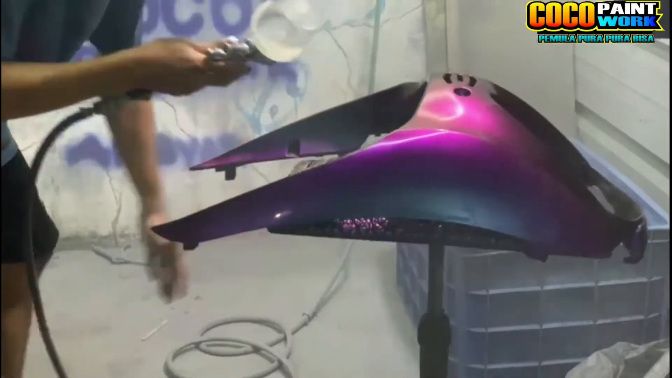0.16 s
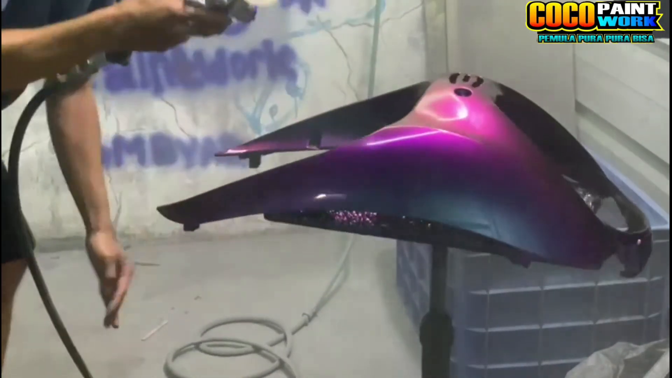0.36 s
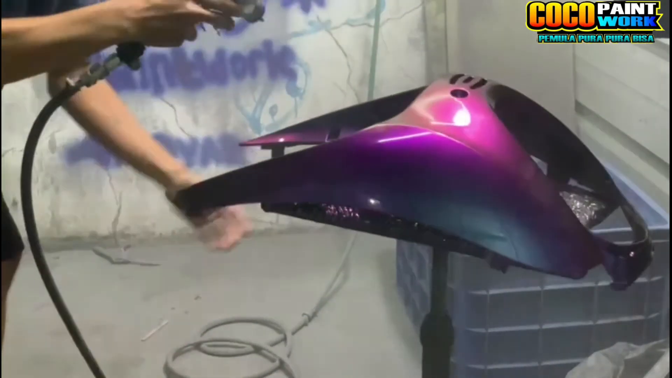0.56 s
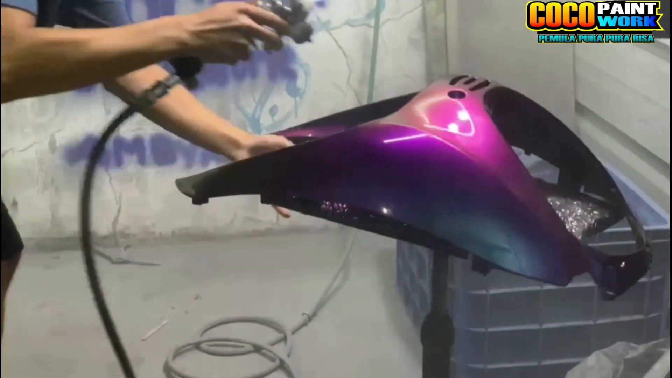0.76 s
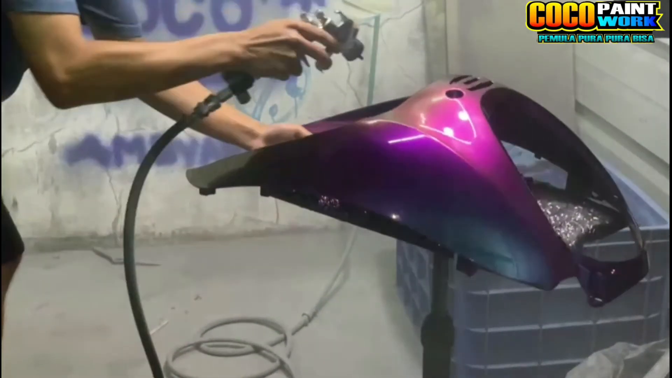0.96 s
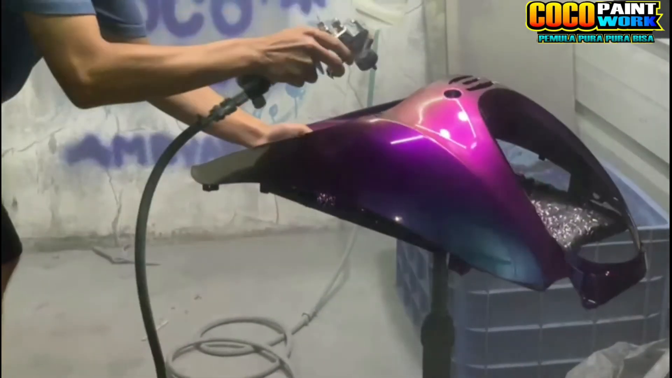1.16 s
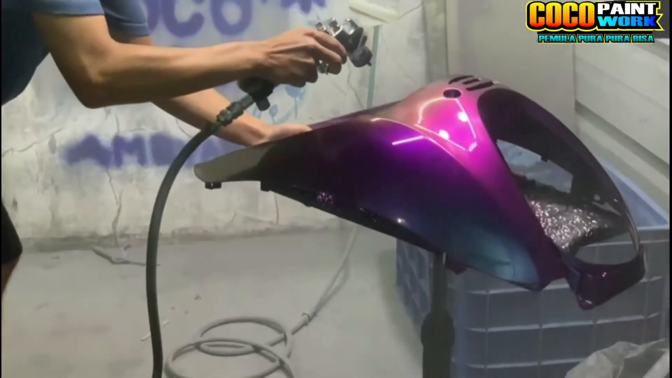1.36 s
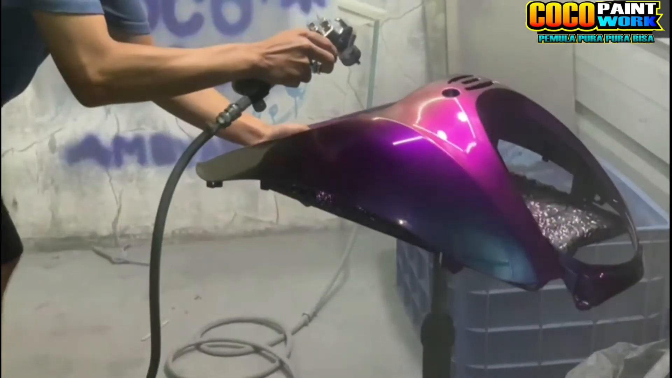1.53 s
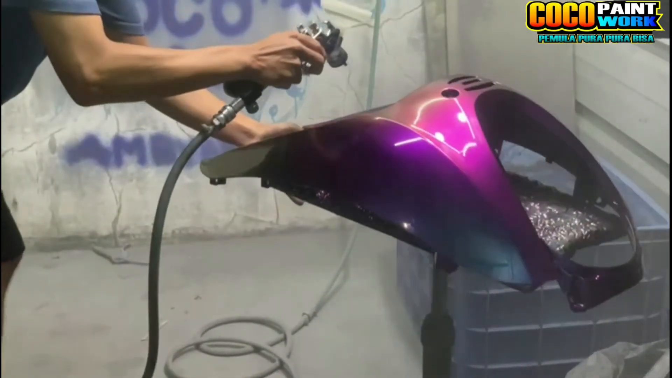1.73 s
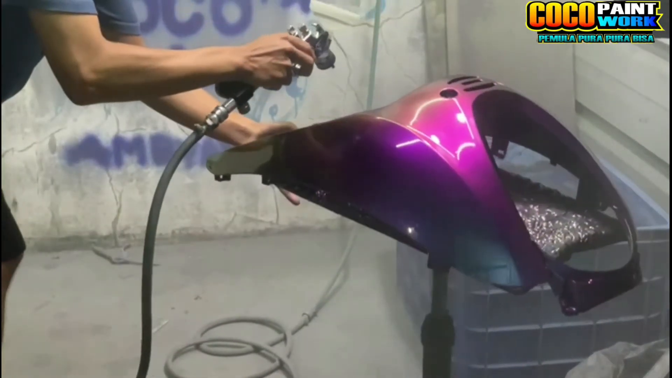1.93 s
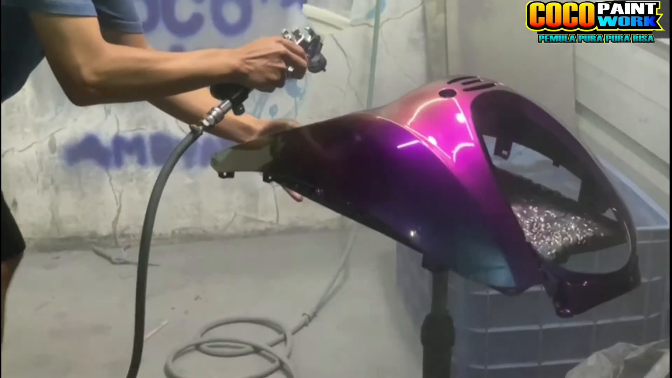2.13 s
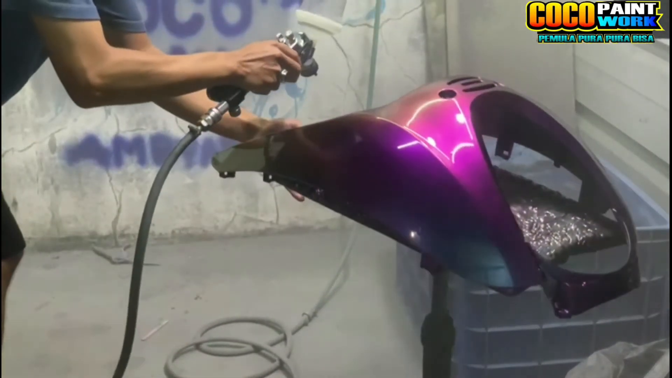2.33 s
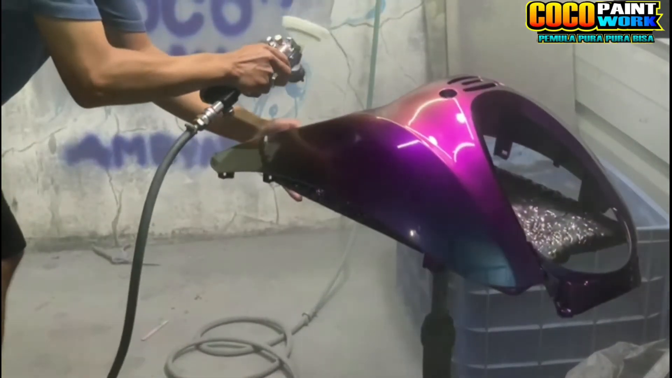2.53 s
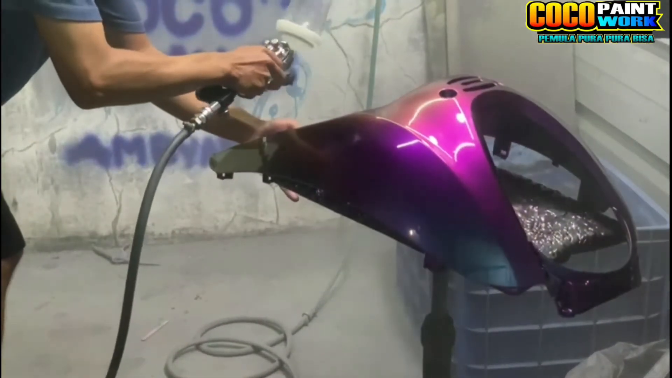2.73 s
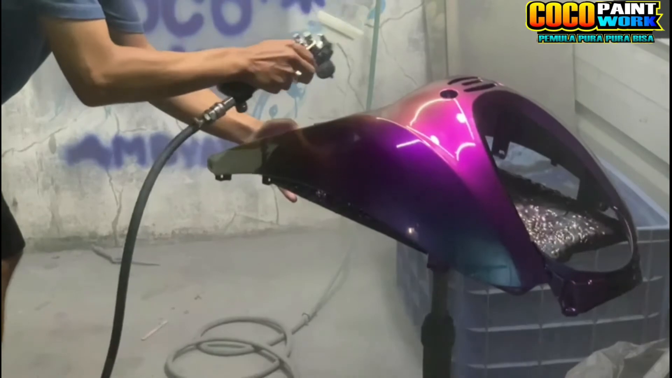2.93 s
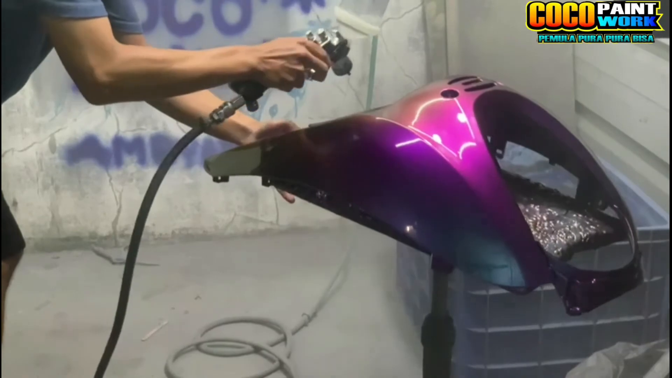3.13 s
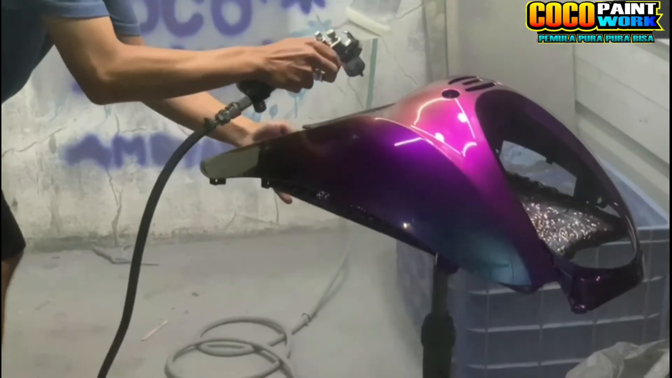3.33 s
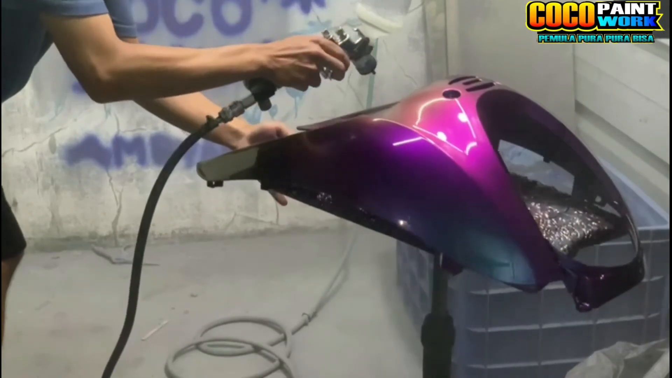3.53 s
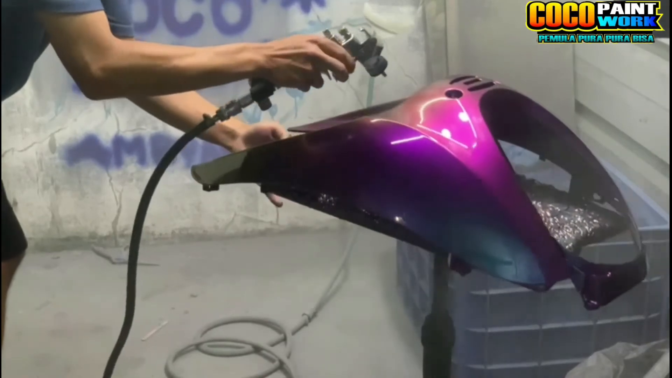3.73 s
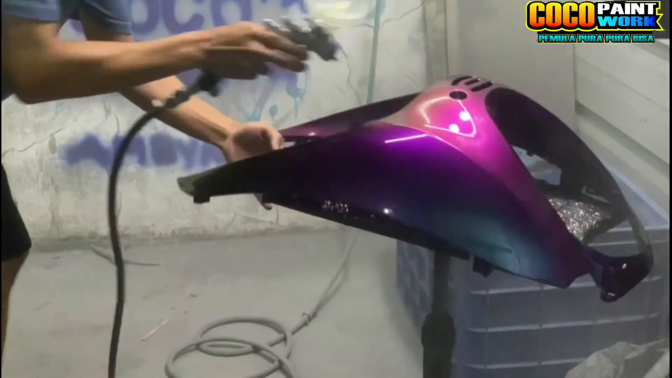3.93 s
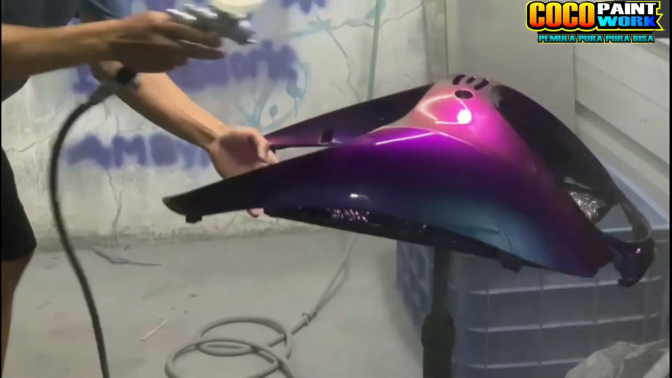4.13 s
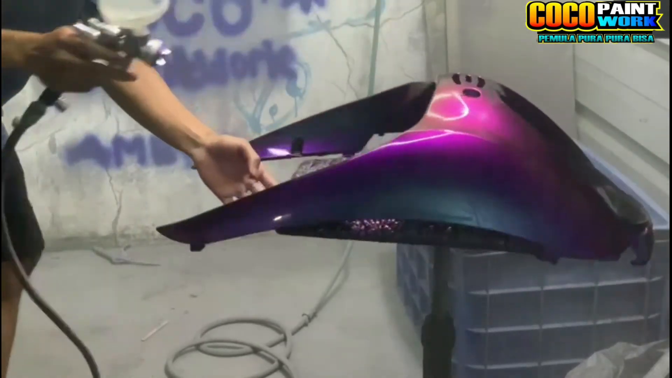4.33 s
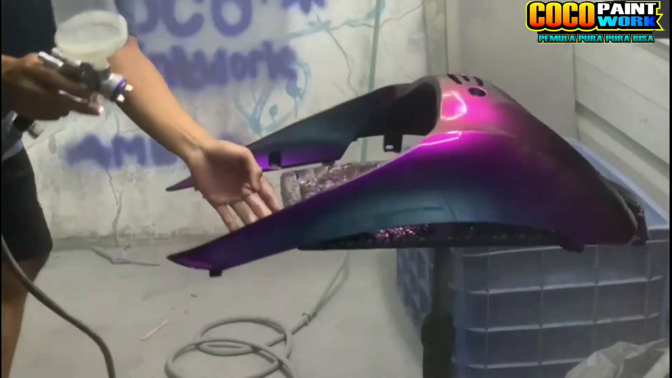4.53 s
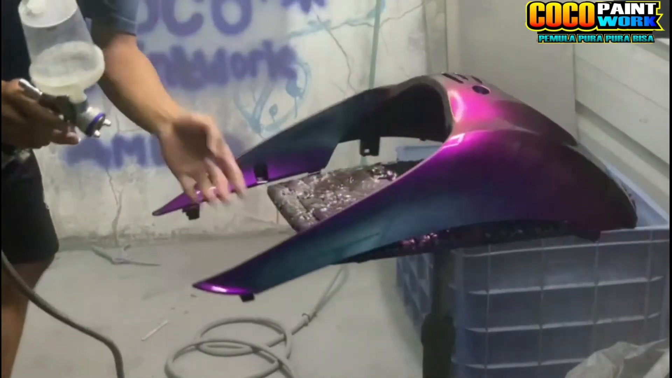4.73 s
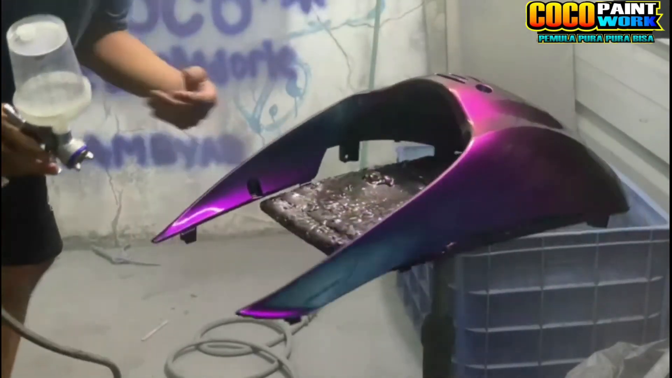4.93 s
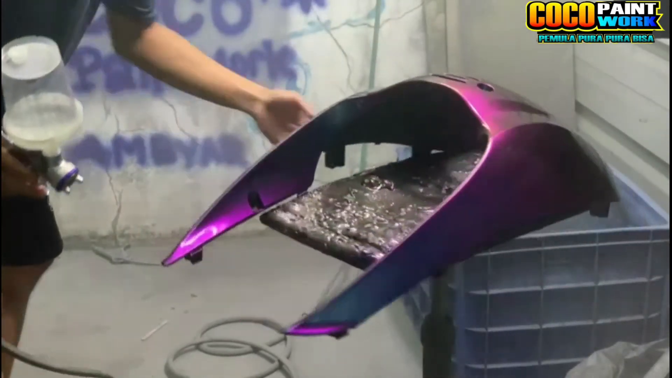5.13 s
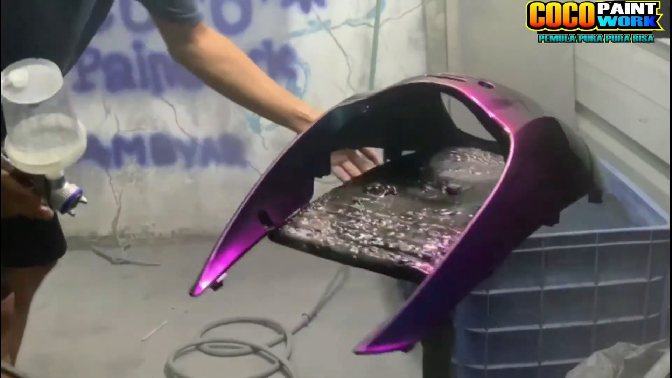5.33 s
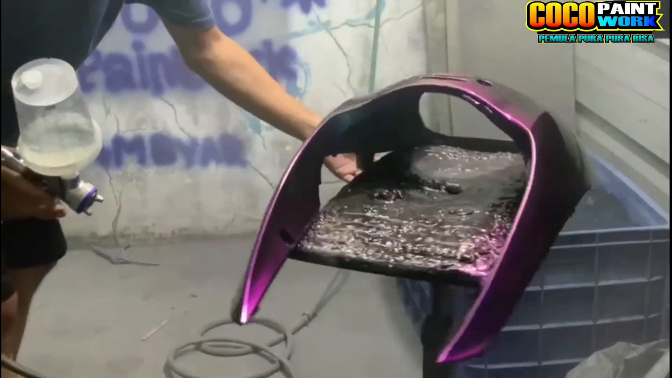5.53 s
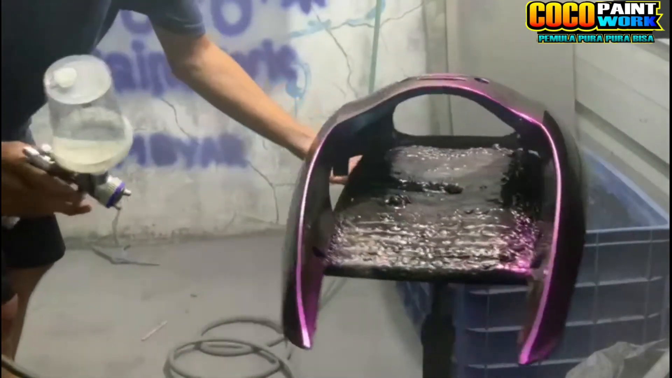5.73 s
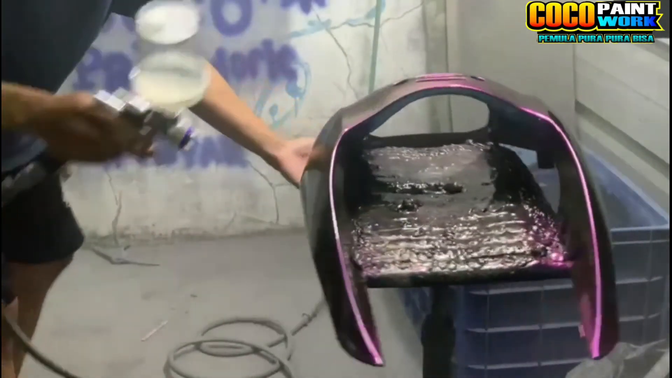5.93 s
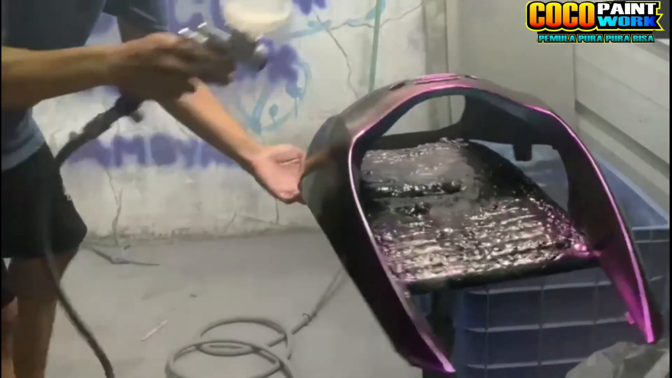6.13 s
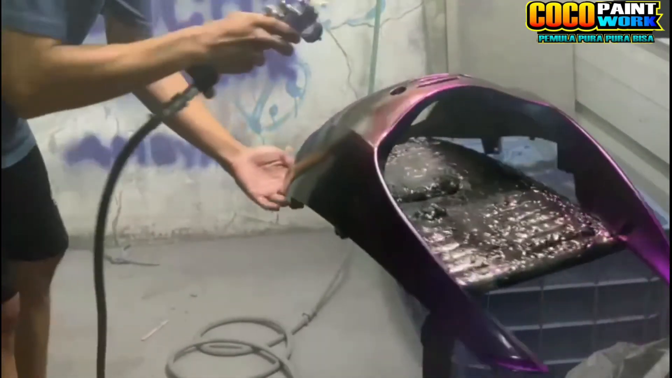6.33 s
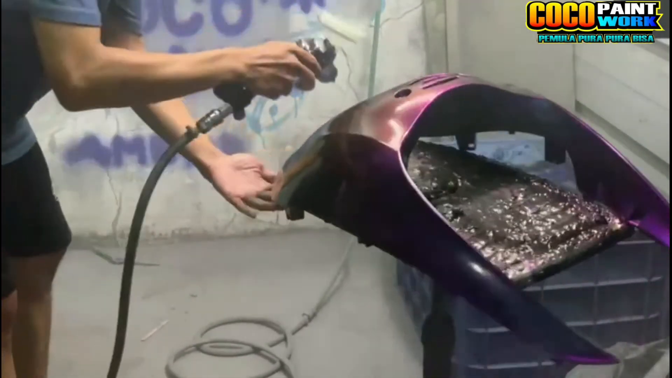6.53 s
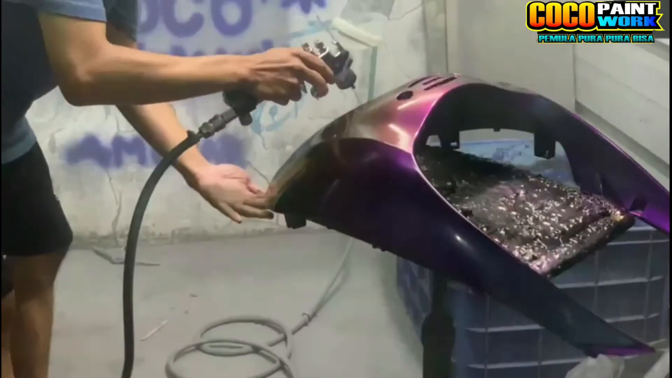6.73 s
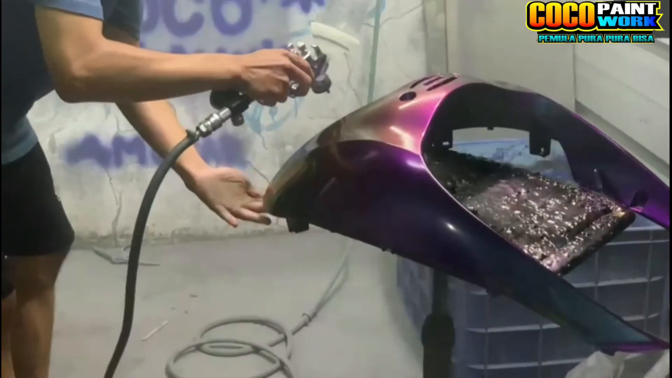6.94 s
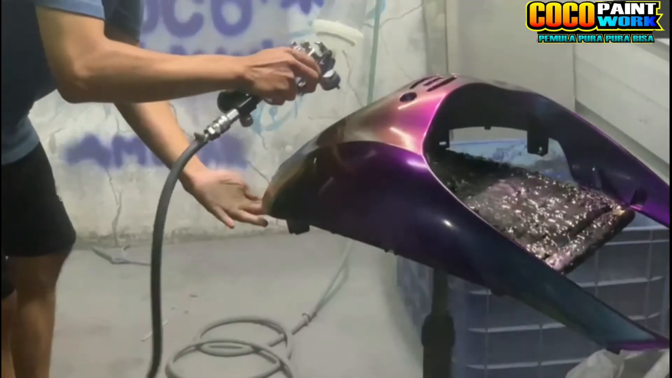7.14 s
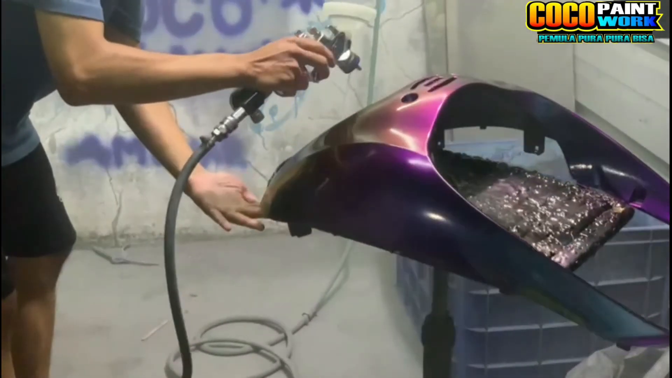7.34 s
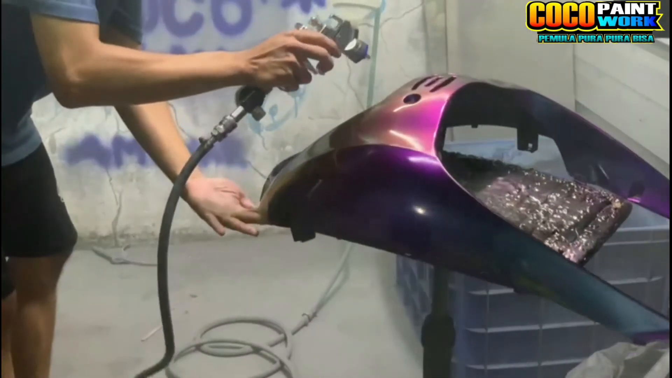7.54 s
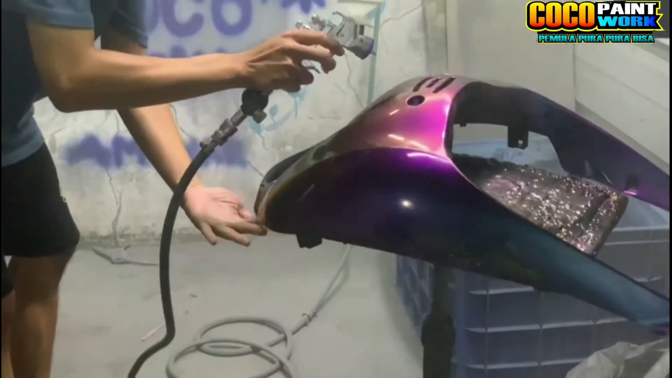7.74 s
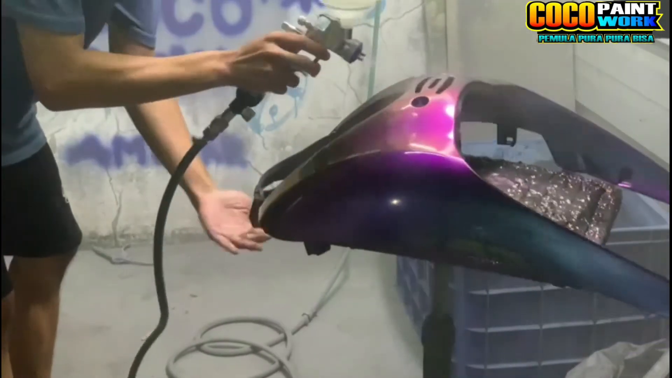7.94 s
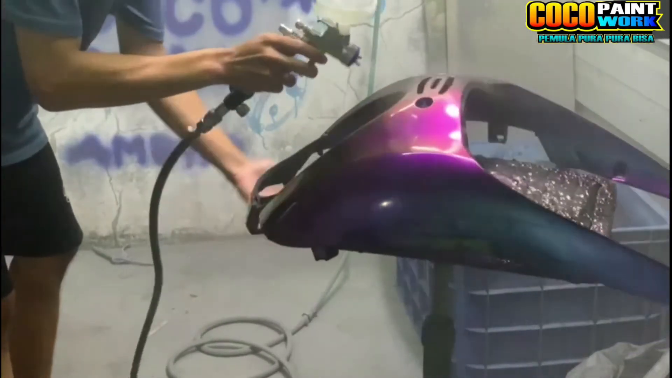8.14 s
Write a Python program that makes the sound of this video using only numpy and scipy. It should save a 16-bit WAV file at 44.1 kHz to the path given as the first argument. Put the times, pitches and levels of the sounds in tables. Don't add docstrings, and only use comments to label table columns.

```python
import sys
import numpy as np
from scipy import signal
from scipy.fft import rfft, irfft, next_fast_len
from scipy.io import wavfile
from scipy.ndimage import uniform_filter1d

SR = 44100
rng = np.random.default_rng(int(sys.argv[2]) if len(sys.argv) > 2 else 0)


def convert_level_to_amplitude(level_db):
    exponent = np.asarray(level_db, float) / 20
    return 10 ** exponent


def int16_out(signal):
    q = np.round(np.clip(np.atleast_2d(signal).T, -1, 1) * 32767)
    wavfile.write(sys.argv[1], SR, q.astype(np.int16))


N = 360738
LEAD = 30000
HZ = np.fft.rfftfreq(next_fast_len(N + LEAD), 1 / SR)
PORT_LAG_S = .000452


def unit(x):
    return x / np.sqrt(np.mean(x ** 2))


def over_hz(table):
    hz, value = np.transpose(table)
    return np.interp(np.log(HZ + 1), np.log(hz), value)


def shape(x, gain):
    size = 2 * len(HZ) - 2
    return irfft(rfft(x, size) * gain, size)[..., :x.shape[-1]]


def walk(rate_hz, count=N):
    hold = int(SR / rate_hz)
    levels = np.repeat(rng.standard_normal(count // 200 + 2), hold)[:count]
    return 1.34 * uniform_filter1d(uniform_filter1d(levels, hold), hold)


def smooth_noise(size, *passes):
    noise = rng.standard_normal(size)
    for width, axis in passes:
        noise = uniform_filter1d(noise, size=width, axis=axis)
    return noise


def eddies(shape_db, flicker_db, rate_hz, count=N):
    out = 0
    for octave in np.arange(4, 14, 1 / 3):
        band = np.clip(1 - abs(np.log2(HZ + 1) - octave) * 3, 0, 1) ** .5
        if np.max(shape_db[band > 0]) > np.max(shape_db) - 60:
            flicker = convert_level_to_amplitude(flicker_db * walk(rate_hz, count=count))
            out = out + flicker * shape(rng.standard_normal(count), band * convert_level_to_amplitude(shape_db))
    return out


def ducking():
    wait_s, duck_s, recover_s = 0.46, 0.071, 0.63
    t, down = np.arange(N) / SR, 0
    for pull_s, release_s, *_ in TRIGGER:
        fall = 1 - np.exp(-np.maximum(t - pull_s - wait_s, 0) / duck_s)
        down = np.maximum(down, fall * np.exp(-np.maximum(t - release_s, 0) / recover_s))
    return down


# shaft multiple, level/dB
SHAFT_TONES = [(1, -40), (2, -55), (3, -47), (4, -34), (5, -53.5), (6, -42.5), (8, -53), (10, -45),
               (13, -56), (15, -74), (33, -56), (48, -56), (92, -66), (96, -58)]
# blade-rate multiple, level/dB
BLADE_TONES = [(1, -36.5), (3, -51), (4, -52), (5, -54), (6, -57), (7, -59), (8, -57), (9, -55), (10, -58),
               (11, -58), (12, -55), (13, -63), (15, -68)]
# f/Hz, level/dB
MAINS_HUM = [(50, -41.5), (100, -55), (612, -48.5)]
# f/Hz, density/dB per Hz
RUSH = [(30, -84), (75, -83), (130, -54.5), (260, -57.5), (330, -60.5), (400, -69.5), (700, -68),
        (1200, -69.5), (2400, -74), (4000, -75.5), (6000, -78.5), (8000, -89), (9100, -100), (10300, -99.5),
        (11000, -99), (12000, -102)]
# f/Hz, width/Hz, density/dB per Hz
ROOM_MODES = [(74.4, 6.2, -57), (122, 20, -61), (158, 13.5, -50.5), (212, 18, -49.5), (238.5, 13, -52),
              (302, 24, -56), (370.7, 12, -59.5), (425.7, 23, -59), (497, 20, -57), (535.5, 18, -58.5),
              (667, 29, -64), (767.6, 47, -58.5), (803, 64, -60.5), (870, 20, -65.5)]
# f/Hz, likeness/0-1
FAN_ALIKE = [(45, .99), (100, .997), (160, .97), (380, .96), (550, .85), (800, .7), (1000, .2), (3000, .3),
             (5000, .45), (9000, .45)]


def fan():
    shaft_hz, blades, fan_db, duck_db = 46.155, 7, -33.5, -1.5
    turn = 2 * np.pi * np.cumsum(shaft_hz * (1 + .00012 * walk(1.5))) / SR
    booms = sum(convert_level_to_amplitude(db) ** 2 / (1 + (2 * (HZ - hz) / width) ** 2) ** 2 for hz, width, db in ROOM_MODES)
    air_db = 10 * np.log10((convert_level_to_amplitude(over_hz(RUSH)) ** 2 + booms) * SR / 2)
    uneven = []
    for k in range(16, 195):
        slope_db = -62.5 - .085 * k - .1 * max(k - 150, 0)
        bunch_db = 3.5 * np.cos(2 * np.pi * (k - 33.0) / 19.6)
        uneven.append((k, slope_db + bunch_db + 2.5 * rng.standard_normal()))
    tones = SHAFT_TONES + [(blades * k, db) for k, db in BLADE_TONES] + uneven
    tones = tones + [(hz / shaft_hz, db) for hz, db in MAINS_HUM]
    heard = []
    for _ in range(2):
        air = eddies(air_db, 0.99, 6)
        high = shape(air, HZ > 1500)
        start = rng.uniform(0, 2 * np.pi, len(tones))
        whine = 0
        for (k, db), phase in zip(tones, start):
            surge_db = 1.5 * walk(5.5) if k < 16 else 0
            whine = whine + convert_level_to_amplitude(db + 2.5 + surge_db) * np.sin(k * turn + phase)
        heard.append(air + .08 * np.cos(turn) * high + whine)
    alike = np.clip(over_hz(FAN_ALIKE), 0, .998)
    lag = np.exp(-2j * np.pi * HZ * (HZ > 1300) * PORT_LAG_S)
    right = shape(heard[0], alike * lag) + shape(heard[1], np.sqrt(1 - alike ** 2))
    return np.array([heard[0], right * convert_level_to_amplitude(0.9)]) * convert_level_to_amplitude(fan_db + 32.5 + duck_db * ducking())


def room(x):
    t60_s, treble_t60_s, build_s = 0.5, 0.33, 0.0031
    t, hop = np.arange(SR // 2) / SR, SR // 8
    out = np.zeros((2, len(x) + SR))
    fade = np.sin(np.pi * np.arange(2 * hop) / (2 * hop))
    lowpass = signal.butter(2, 3000, fs=SR, output="sos")
    for at in range(0, len(x) - hop, hop):
        noise = rng.standard_normal((2, len(t))) * (1 - np.exp(-t / build_s))
        dull = signal.sosfilt(lowpass, noise)
        tail = dull * convert_level_to_amplitude(-60 * t / t60_s) + (noise - dull) * convert_level_to_amplitude(-60 * t / treble_t60_s)
        tail = tail / np.sqrt(np.sum(tail ** 2, axis=1, keepdims=True))
        piece = x[at:at + 2 * hop]
        wet = signal.fftconvolve((piece * fade[:len(piece)])[None], tail)
        out[:, at:at + wet.shape[1]] += wet
    return out[:, :len(x)]


# open t/s, close t/s, nozzle hiss level/dB, panel wash level/dB, panel roar level/dB
TRIGGER = [
    (-.5, .03, -29, -45, -52.5),
    (1.05, 3.855, -24.5, -38, -44.5),
    (6.753, 9.0, -24, -37.5, -36.5),
]
# f/Hz, density/dB per Hz
NOZZLE = [(1500, -24), (3000, -11), (4300, -3), (5000, 0), (5600, 0), (6500, 1), (7300, -0.8), (8100, -5),
          (8700, -8.5), (9300, -8.5),
          (10200, -10), (10900, -9), (11500, -10), (11750, -15), (12400, -19)]
# f/Hz, density/dB per Hz
WASH = [(900, -23), (1300, 0), (1750, -3), (2300, -2), (3200, 3.5), (4500, 0.5), (7000, -56)]
# f/Hz, density/dB per Hz
ROAR = [(350, -8.5), (600, 1), (900, -1.5), (1300, -14.5), (2000, -14.5)]


def spray_gun():
    open_s, close_s, room_db = 0.0099, 0.019, 8
    build_db, build_s = -3, 0.27
    surplus_db, sag_s, roar_surplus_db = 3.5, 0.42, .5
    t = np.arange(-LEAD, N) / SR
    count = len(t)
    hiss = unit(eddies(over_hz(NOZZLE), 0.45, 14, count=count)) * convert_level_to_amplitude(0.24 * walk(4.6, count=count))
    wash = unit(eddies(over_hz(WASH), 0.7, 10, count=count)) * convert_level_to_amplitude(0.25 * walk(4.0, count=count))
    roar = unit(eddies(over_hz(ROAR), 1.9, 23, count=count)) * convert_level_to_amplitude(2.2 * walk(3.5, count=count))
    jet = 0
    for pull_s, release_s, hiss_db, wash_db, roar_db in TRIGGER:
        valve = np.clip((t - pull_s) / open_s, 0, 1) * np.clip((release_s - t) / close_s, 0, 1)
        since = np.maximum(t - pull_s, 0)
        surplus = np.exp(-since / sag_s)
        flow = valve * convert_level_to_amplitude(build_db * np.exp(-since / build_s) + surplus_db * surplus)
        panel = wash * convert_level_to_amplitude(wash_db + 3) + roar * convert_level_to_amplitude(roar_db + roar_surplus_db * surplus)
        jet = jet + flow * (hiss * convert_level_to_amplitude(hiss_db) + panel)
    direct = np.array([jet, shape(jet, np.exp(-2j * np.pi * HZ * PORT_LAG_S))])
    return ((direct + convert_level_to_amplitude(room_db) * room(jet)) * convert_level_to_amplitude(-7.5))[:, LEAD:]


def scene():
    return spray_gun() + fan()


# f/Hz, level/dB
RIGHT_PORT = [(3000, -.6), (5500, -.6), (6600, .8), (7500, 3.3), (8200, 6.5), (8800, 5.5), (10000, 0.1)]
# f/Hz, phase/rad
BASS_TURN = [(46, 3.52), (95, 3.17), (140, 3.05), (220, 1.7), (310, 0.0), (420, -.25), (460, -1.6),
             (560, -1.7), (650, -1.0), (900, -.8), (1400, 0.0)]
# f/Hz, density/dB per Hz
DRAUGHT = [(10, -64), (25, -90), (45, -59), (68, -67), (85, -74.5), (110, -100), (200, -150)]


def ports(dry):
    right = shape(dry[1], convert_level_to_amplitude(over_hz(RIGHT_PORT)) * np.exp(1j * over_hz(BASS_TURN)))
    gust = shape(rng.standard_normal((2, N)), convert_level_to_amplitude(over_hz(DRAUGHT)) * np.sqrt(SR / 2)) * convert_level_to_amplitude(2.5 * walk(6))
    return np.array([dry[0], right]) + gust


# f/Hz, level/dB
DIFFERENCE_LEAN = [(2000, 0), (3300, .8), (4400, 1.2), (4900, 1), (5500, 3.2), (6000, 2.4), (6300, 0),
                   (6700, -1.5), (7300, -.3), (8900, .3), (9200, -13), (10200, -13), (10330, 0), (10600, 6),
                   (10950, 11), (11200, 24)]
# f/Hz, depth/dB
FINENESS = [(86, 31), (260, 24), (700, 18), (1200, 12), (2600, 5.5), (5000, 7.5), (7500, 12.5), (9800, 0.5)]
STEP_BANDS = np.r_[0:40:4, 40:96:8, 96:144:12, 144, 160, 176, 196, 216, 240, 264, 292, 320:560:32]
# t/s, length/s, f/Hz, width/Hz
DROPOUTS = [(.07, .06, 3400, 350), (.165, .07, 5500, 500), (.21, .07, 2900, 300), (.24, .05, 3700, 300),
            (.3, .09, 2580, 250), (.345, .07, 3550, 400), (.4, .04, 5500, 600), (.54, .14, 5500, 300),
            (.55, .05, 3350, 350), (.63, .07, 5750, 300), (.68, .12, 2720, 150), (1.25, .06, 5500, 200),
            (1.345, .04, 5450, 350), (1.36, .03, 3200, 150), (1.66, .02, 5450, 450), (2.03, .03, 5100, 350),
            (2.49, .03, 3600, 250), (2.87, .07, 5300, 150), (2.95, .08, 5850, 150), (3.1, .1, 5950, 150),
            (3.49, .06, 5300, 150), (3.72, .06, 5350, 200), (4.0, .03, 5350, 400), (4.09, .11, 5750, 200),
            (4.31, .05, 5800, 300), (4.4, .02, 5500, 250), (4.42, .04, 3600, 150), (4.56, .02, 5650, 400),
            (4.68, .02, 5500, 500), (5.78, .07, 5650, 200), (6.09, .04, 5650, 250), (6.87, .05, 5700, 400),
            (7.55, .04, 4000, 200), (2.16, .05, 6050, 250), (2.33, .05, 5600, 900), (2.38, .09, 5200, 300),
            (2.57, .09, 5450, 200), (5.23, .04, 5700, 400), (5.5, .06, 5950, 500), (5.56, .06, 5600, 900),
            (5.93, .06, 3350, 350), (6.02, .04, 3600, 300), (6.28, .05, 5500, 400), (6.45, .09, 5400, 350),
            (6.5, .05, 5050, 500), (6.67, .06, 3600, 250), (7.23, .07, 5600, 500)]
# t/s, length/s
BASS_GAPS = [(.1, .07), (.18, .04), (.4, .12), (.56, .11), (.7, .02), (.76, .04), (.89, .02), (.96, .02),
             (1.245, .04), (1.54, .02), (1.7, .06), (1.895, .04), (2.01, .04), (2.19, .02), (2.35, .06),
             (2.5, .08), (2.705, .09), (2.81, .02), (2.93, .02), (3.02, .02), (3.19, .02), (3.3, .02),
             (3.475, .04), (3.6, .02), (3.685, .04), (3.85, .04), (4.0, .06), (4.6, .02), (4.76, .02),
             (4.83, .02), (4.94, .04), (5.125, .04), (5.275, .06), (5.425, .04), (5.53, .02), (5.61, .04),
             (5.79, .02), (5.95, .02), (6.1, .04), (6.24, .04), (6.405, .09), (6.54, .04), (6.71, .02),
             (6.78, .02), (6.85, .02), (6.97, .02), (7.2, .02), (7.375, .09), (7.53, .02), (7.645, .06),
             (7.815, .09), (8.015, .06)]
# f/Hz, share under spray/0-1, share fan alone/0-1
STREAKS = [(900, .04, .05), (1800, .08, .09), (2600, .07, .24), (3200, .11, .26), (3700, .09, .31),
           (4300, .04, .16), (4900, .07, .25), (5200, .27, .28), (5900, .27, .28), (6300, .13, .22),
           (6800, .03, .1), (9000, .03, .1)]


def watery_grain(left, right):
    pad, under_db, quiet_db = 2048 - 851, 5.2, -93
    warble_db, dropout_db, side_top_hz = 2.2, -34, 11640
    n, k = np.arange(2048), np.arange(560)
    frames = N // 1024 + 3
    window = signal.windows.kaiser_bessel_derived(2048, 4 * np.pi)[:, None]
    lapped = window * np.cos(np.pi / 1024 * np.outer(n + 512.5, k + .5)) / np.sqrt(512)
    x = np.pad([(left + right) / 2, (left - right) / 2], ((0, 0), (pad, 4096)))
    z = (x[:, 1024 * np.arange(frames)[:, None] + n] @ lapped).transpose(0, 2, 1) / 41
    line_hz, centre = k[:, None] * SR / 2048, k[4::8, None] * SR / 2048
    clock = (1024 * np.arange(frames) + 1024 - pad) / SR

    bands = 10 * np.log10(np.mean(z.reshape(2, 70, 8, -1) ** 2, axis=2) + 1e-20)
    bands = uniform_filter1d(bands, size=2, axis=2)
    loudness = bands[:, 30:50].mean(axis=(0, 1))
    mood = 4.88 * smooth_noise(bands.shape, (3, 2), (2, 1)) + smooth_noise(bands.shape[2], (3, 0))

    spare = loudness < -66
    lean = np.interp(centre, *np.transpose(DIFFERENCE_LEAN))
    spare_lean = np.maximum(lean, -5) + (abs(centre - 3000) < 900) - (abs(centre - 5600) < 600)
    gap = bands[1] - bands[0] + np.where(spare, spare_lean, lean)
    rise = np.diff(loudness, prepend=0)
    rise = (rise > 5) & (rise >= np.roll(rise, 1)) & (rise >= np.roll(rise, -1))
    rise = np.roll(rise, -1)
    outweighed = np.array([gap - 4 * (centre < 8000), -gap]) + mood > under_db - 1.2 * spare + 3000 / centre
    favour = np.array([2 - 3 * (centre > 10300), np.where(centre > 10300, 3.5, -2.5)])
    lost = outweighed | (bands + favour + 1.5 * mood < quiet_db)

    warble = np.sqrt(15) * smooth_noise(z.shape, (3, 1), (5, 2))
    z = z * convert_level_to_amplitude((warble_db * warble - .115 * warble_db ** 2) * np.clip(line_hz / 1200, 0, 1))
    hollow = 0
    for s, length, hz, width in DROPOUTS:
        in_time = (2 * (clock - s) / (length + .02)) ** 4
        hollow = hollow + np.exp(-in_time - (2 * (line_hz - hz) / (.9 * width + 45)) ** 2)
    z[0] *= convert_level_to_amplitude(dropout_db * hollow)

    fine_hz, fine_db = np.transpose(FINENESS)
    fine_db = np.interp(np.log(centre), np.log(fine_hz), fine_db)
    fine_db = fine_db + (2.5 + spare) * (centre > 2300) * (centre < 8300)
    wide = np.diff(np.r_[STEP_BANDS, 560])
    line_db = np.repeat(bands.max(axis=0) + .8 * mood - fine_db, 8, axis=1)
    step_db = np.add.reduceat(line_db, STEP_BANDS, axis=1) / wide[:, None]
    step = convert_level_to_amplitude(1.5 * np.round(np.repeat(step_db, wide, axis=1) / 1.5))
    z = np.sign(z) * np.floor((abs(z) / step) ** .75 + .4054) ** (4 / 3) * step
    z = z * np.repeat(~lost | rise | (centre < 900), 8, axis=1)
    z = z * ((warble > -2.2) | (k[:, None] < 60) | rise)
    z[0, :4] *= ~np.any([abs(clock - s) < length / 2 + .006 for s, length in BASS_GAPS], axis=0)

    blots = smooth_noise(z.shape[1:], (5, 0), (5, 1))
    rank = blots.ravel().argsort().argsort().reshape(blots.shape) / blots.size
    hz, spraying, idle = np.transpose(STREAKS)
    share = np.where(spare, np.interp(line_hz, hz, idle), np.interp(line_hz, hz, spraying))
    z[0] *= (rank > share * (line_hz > 900)) | rise
    z[1] *= line_hz < side_top_hz + 110 * uniform_filter1d(rng.exponential(size=frames) ** 1.5, size=2)

    halves = (41 * z.transpose(0, 2, 1) @ lapped.T).reshape(2, frames, 2, 1024)
    joined = (halves[:, 1:, 0] + halves[:, :-1, 1]).reshape(2, -1)
    mid, side = joined[:, pad - 1024:pad - 1024 + N]
    return np.array([mid + side, mid - side])


def band_limit(x):
    return signal.sosfilt(signal.butter(12, 12070, fs=SR, output="sos"), x)


def record(dry):
    left, right = ports(dry)
    mix = watery_grain(left, right)
    return band_limit(mix)


dry = scene()
out = record(dry)
int16_out(out)
```